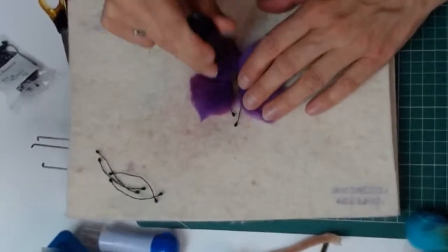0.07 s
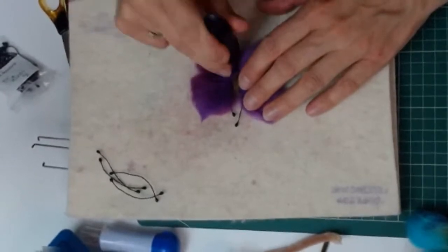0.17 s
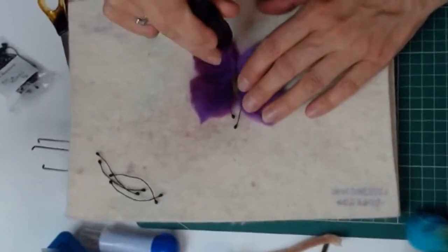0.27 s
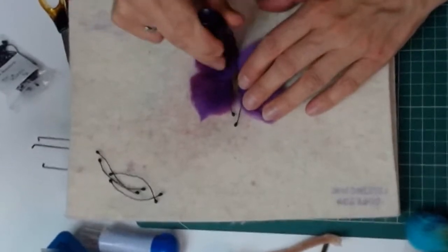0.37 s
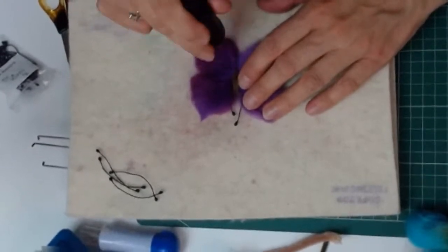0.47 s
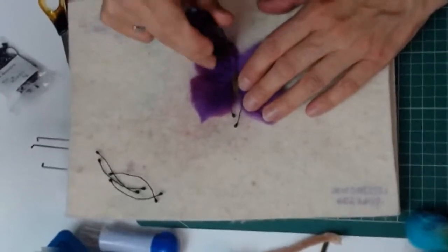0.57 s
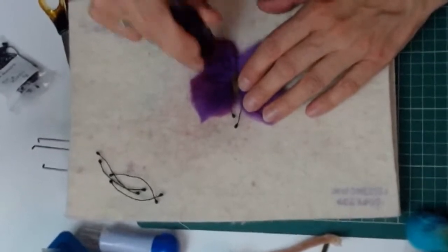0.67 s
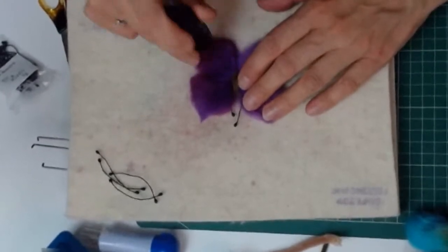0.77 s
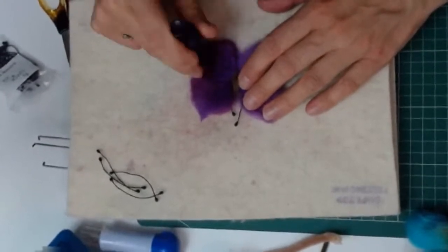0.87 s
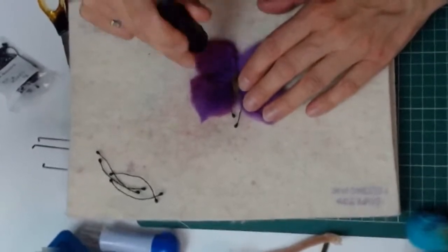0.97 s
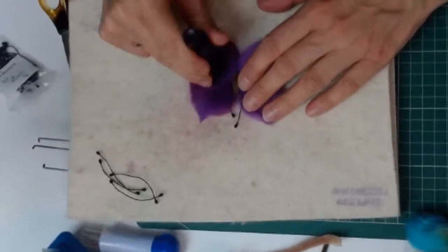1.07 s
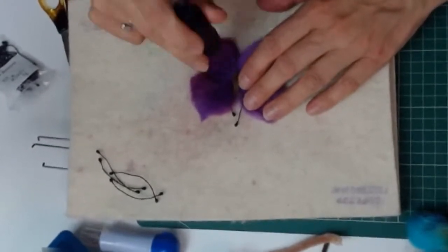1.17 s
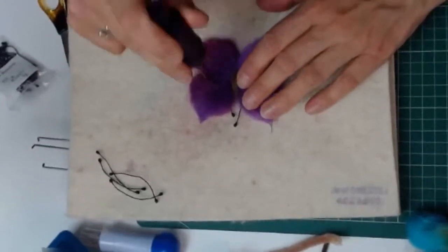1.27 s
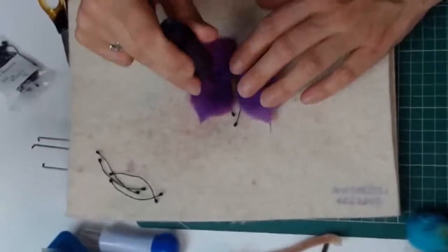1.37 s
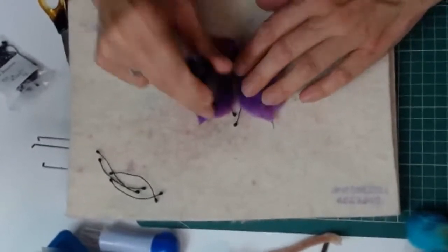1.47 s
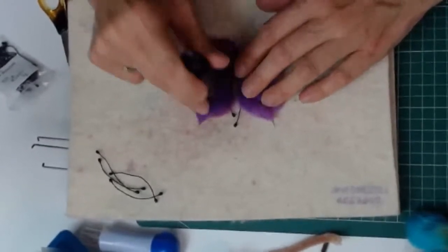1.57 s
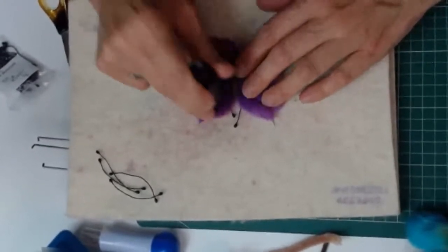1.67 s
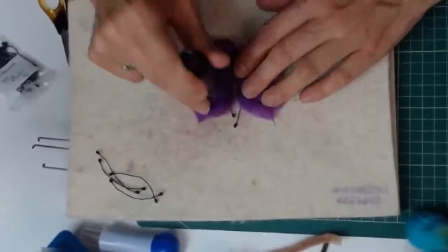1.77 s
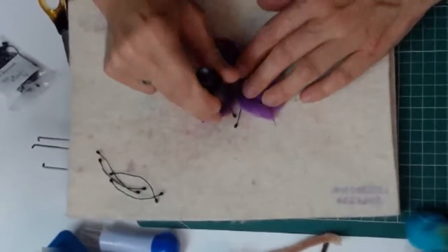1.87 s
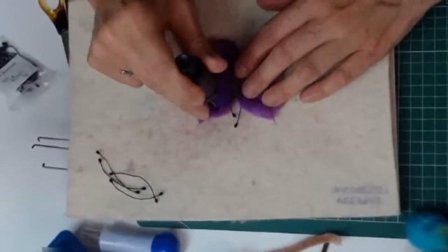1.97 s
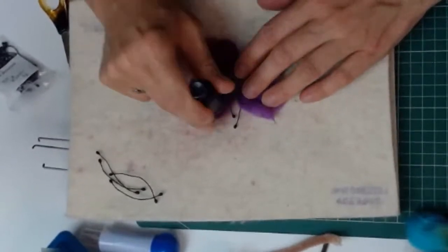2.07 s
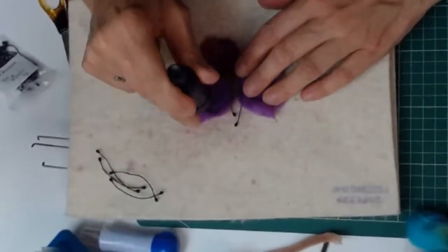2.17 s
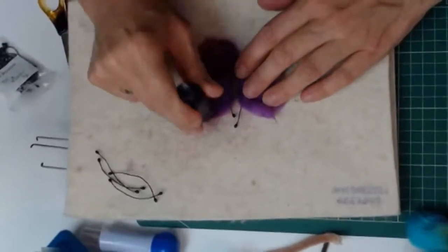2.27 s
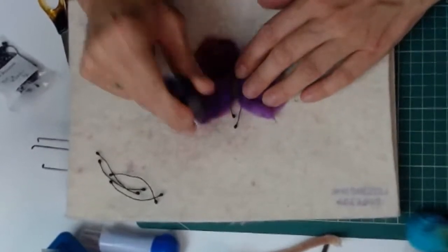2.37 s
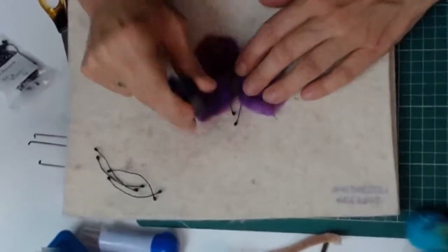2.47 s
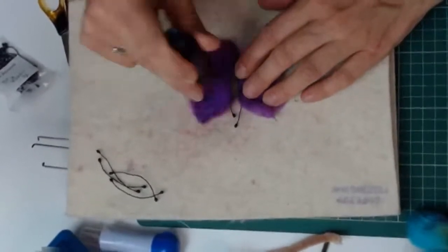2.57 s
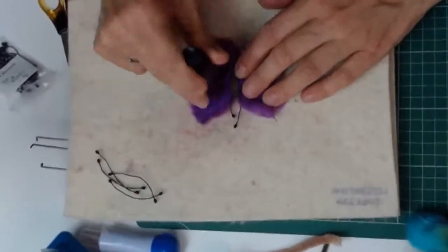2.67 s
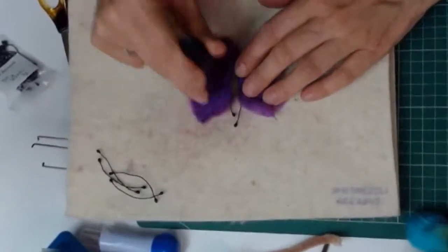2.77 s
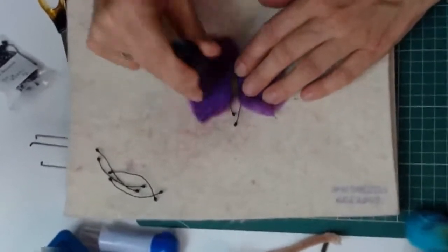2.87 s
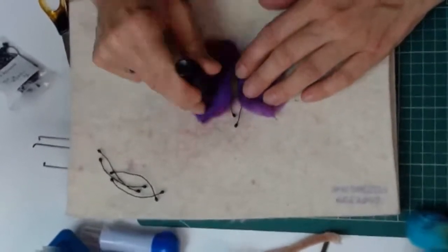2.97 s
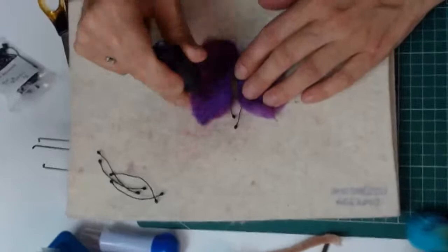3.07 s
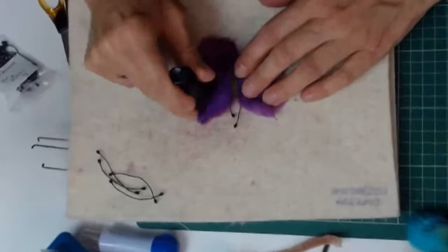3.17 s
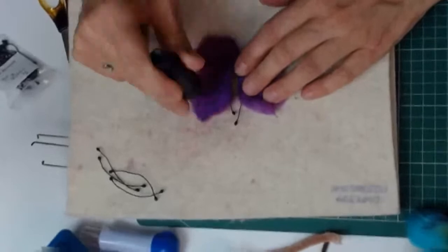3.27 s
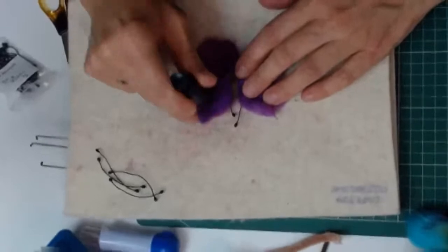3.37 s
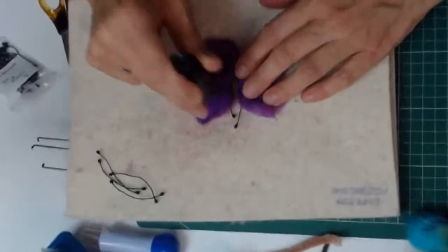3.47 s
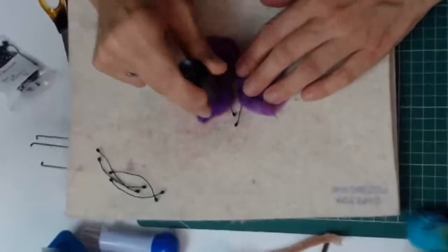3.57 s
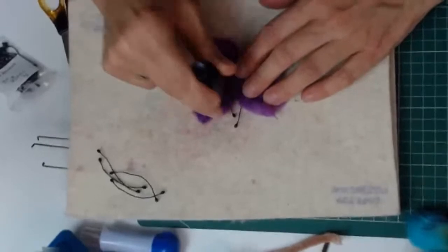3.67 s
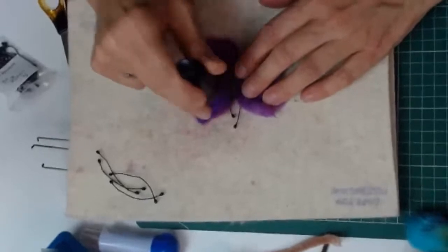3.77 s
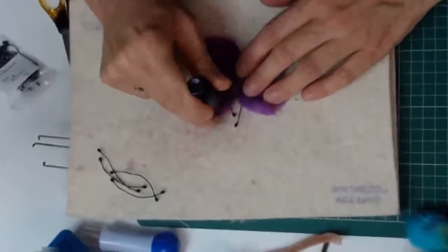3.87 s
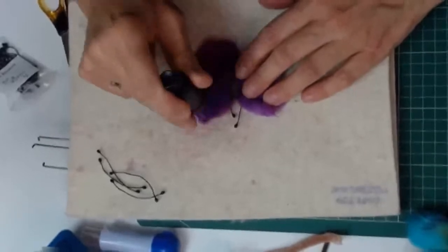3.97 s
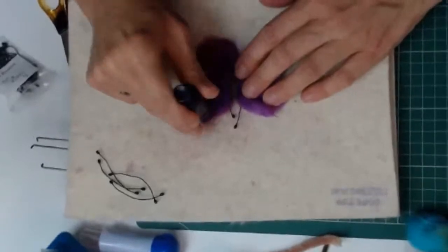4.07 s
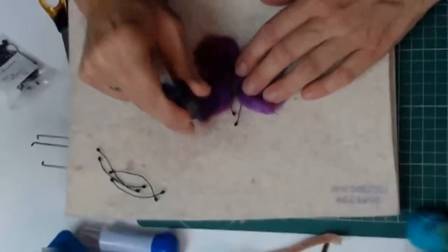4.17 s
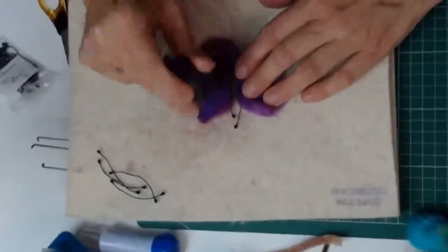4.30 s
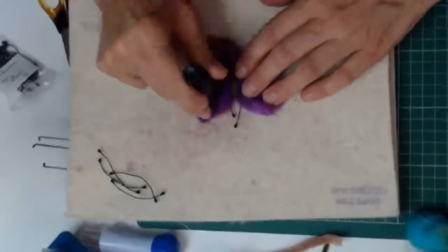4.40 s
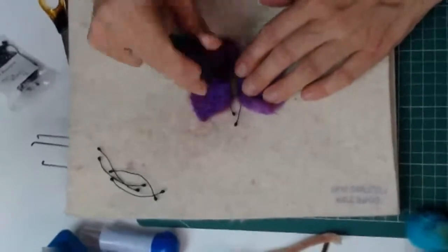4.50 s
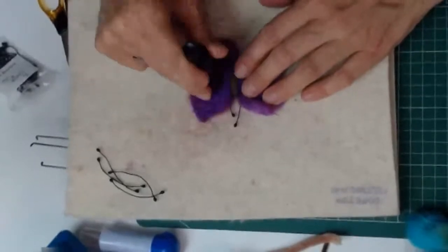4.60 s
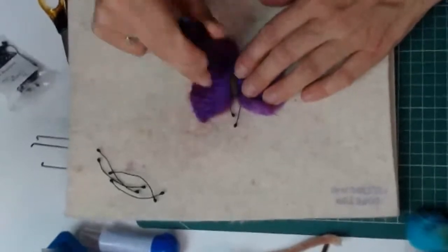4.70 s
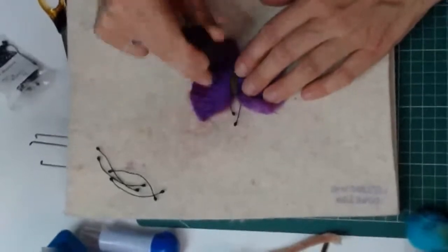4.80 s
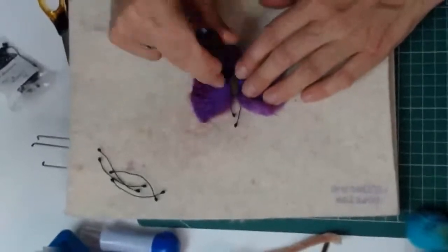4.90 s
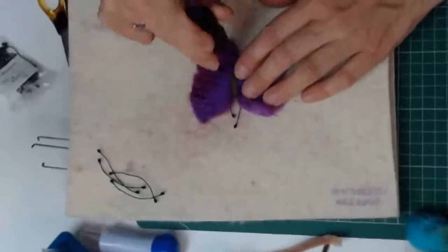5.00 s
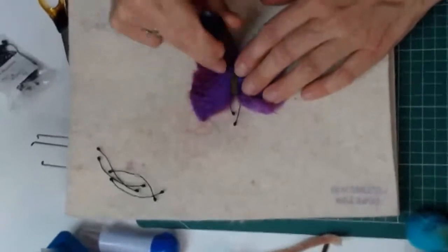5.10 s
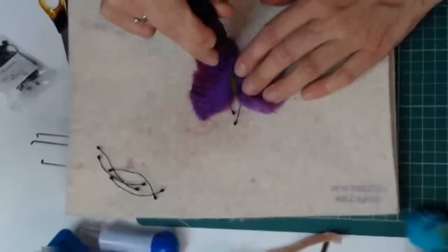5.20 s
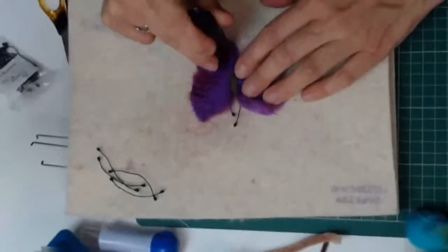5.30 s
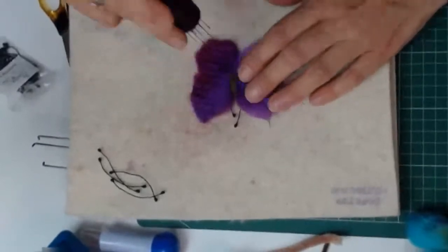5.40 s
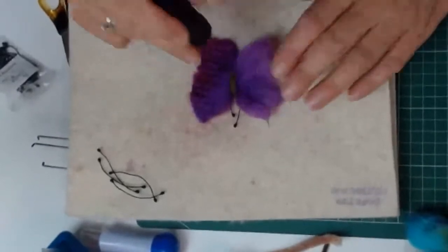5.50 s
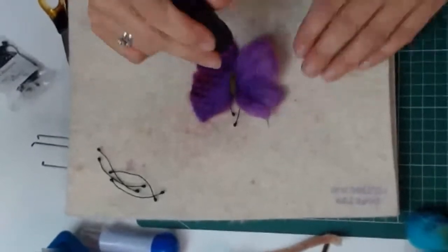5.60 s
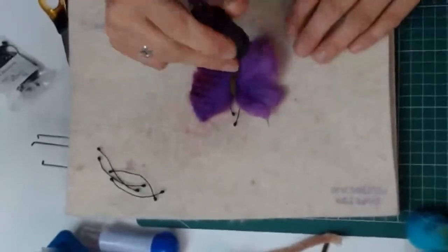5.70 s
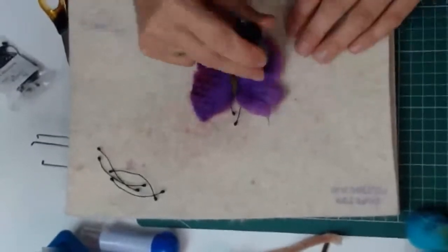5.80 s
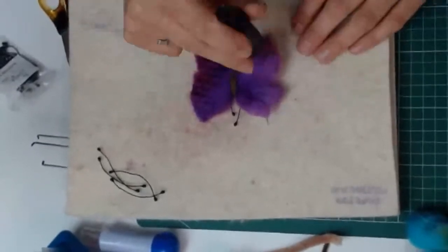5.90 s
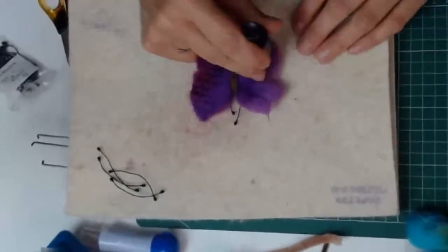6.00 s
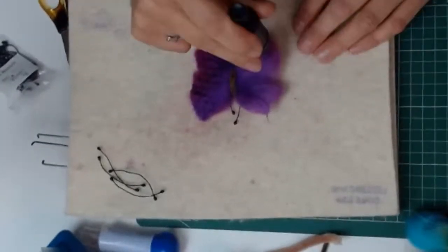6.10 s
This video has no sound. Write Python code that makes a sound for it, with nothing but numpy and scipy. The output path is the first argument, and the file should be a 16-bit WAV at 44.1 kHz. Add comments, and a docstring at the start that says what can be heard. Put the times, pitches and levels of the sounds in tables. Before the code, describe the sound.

Close, soft crunches and dull table thumps repeat about six times a second as felting needles poke wool in a quiet, humming room.

```python
"""Soft, crunchy stabs, about six a second: a needle felting tool pokes wool on a thick mat, close by.
Each stab tears through the fibres and thumps the table, which sways, knocks and rings.
Between stabs the needles tick and rustle as they pull out, and the felt creaks as it springs back.
Skin scuffs the mat now and then, and near the end a hand slides off it and fingers tap it.
Behind it all is the low hum of a quiet room with a faint, thin tone."""
import sys
import numpy as np
from scipy import signal
from scipy.fft import rfft, irfft, next_fast_len
from scipy.io import wavfile
from scipy.ndimage import uniform_filter1d

SR = 44100
rng = np.random.default_rng(int(sys.argv[2]) if len(sys.argv) > 2 else 0)


def wrap_up_sound(samples):
    """Save the sound to the file named by the first command line argument, as 16-bit audio."""
    columns = np.atleast_2d(samples).T
    # keep every value between -1 and 1, then stretch to whole-number steps
    tamed = np.clip(columns, -1, 1)
    steps = np.round(tamed * 32767).astype(np.int16)
    wavfile.write(sys.argv[1], SR, steps)


N = 271126
TIME_S = np.arange(N) / SR


def gain_of(db):
    """Turns decibels into a number to multiply a sound by."""
    return 10 ** (np.asarray(db) / 20)


def curve_at(points, hz):
    """Joins a table's points along a log frequency axis and reads the value at hz."""
    pitches, values = np.transpose(points)
    return np.interp(np.log(hz + 1), np.log(pitches + 1), values)


def evened(x):
    """Scales a sound to an average (rms) size of 1."""
    return x / np.sqrt(np.mean(x ** 2) + 1e-20)


def add(mix, start_s, sound):
    """Mixes a sound in at start_s."""
    part = mix[..., max(round(start_s * SR), 0):][..., :sound.shape[-1]]
    part += sound[..., :part.shape[-1]]


def split(x, hz):
    """The parts of a sound below and above hz."""
    low = signal.sosfiltfilt(signal.butter(2, hz, fs=SR, output="sos"), x)
    return low, x - low


def stroke(length_s, rise_s, tail_s):
    """The loudness of one rub: it swells, weakens while it lasts, then dies away."""
    t = np.arange(round((length_s + rise_s + 6 * tail_s) * SR)) / SR
    swell = np.clip(t / rise_s, 0, 1) ** 2
    return swell * np.exp(-t / 0.081 - np.maximum(t - rise_s - length_s, 0) / tail_s)


def ringing(notes):
    """A struck object's notes: sine waves that each fade by 60 dB in ring_s."""
    def note(pitch_hz, level_db, ring_s, signed_gain=1):
        t = np.arange(SR) / SR
        return signed_gain * gain_of(level_db - 60 * t / ring_s) * np.sin(2 * np.pi * pitch_hz * t)
    return sum(note(*row) for row in notes)


# How alike left and right are (1 = the same): pitch_hz, likeness
STEREO_LIKENESS = [(120, 0.74), (300, 0.94), (700, 0.95), (1600, 0.72), (2800, 0.83), (5500, 0.69),
                   (8000, 1)]

def grit(colour, grain_db, patchy_db, grain_s=0.001):
    """Stereo noise like snapping fibres: grain_db makes it rough, patchy_db makes its colour drift."""
    size = next_fast_len(N)
    hz = np.fft.rfftfreq(size, 1 / SR)
    grain = np.interp(np.arange(N), np.arange(N) * grain_s * SR, rng.standard_normal(N))
    shared, apart = rfft(gain_of(grain_db * grain) * rng.standard_normal((2, N)), size)
    likeness = np.clip(curve_at(STEREO_LIKENESS, hz), 0, 1)
    shared *= np.sqrt((1 + likeness) / 2)
    apart *= np.sqrt((1 - likeness) / 2)
    left_right = np.array([shared + apart, shared - apart])
    noise = irfft(gain_of(curve_at(colour, hz)) * left_right, size)[:, :N]
    slices = signal.stft(noise, nperseg=256)[2]
    patches = uniform_filter1d(rng.standard_normal(slices.shape[1:]), size=4, axis=0)  # blur in pitch
    patches = uniform_filter1d(patches, size=6, axis=1)  # blur in time
    slices *= gain_of(patchy_db * evened(patches))
    return evened(signal.istft(slices, nperseg=256)[1][:, :N])


# The colour of the room's noise: pitch_hz, level_db
ROOM_COLOUR = [(20, 4), (54, -0.5), (110, -11), (149, -3.5), (261, -16.5), (370, -18.5), (684, -22.5),
               (1030, -23), (1710, -30.5), (2500, -35.5), (7460, -45), (8690, -75.5)]

def room_tone():
    """A quiet room's low hum and air noise, plus a thin tone that fades near the end."""
    tone_db = np.interp(TIME_S, [5.1, 5.6], [-90, -101])
    tone = gain_of(tone_db) * np.sqrt(2) * np.sin(2 * np.pi * 8000 * TIME_S)
    return gain_of(-57) * grit(ROOM_COLOUR, grain_db=0, patchy_db=1) + tone


def wall_echo(sound, ring_s=0.22):
    """A short, blurred echo: long waves reach both sides alike, short ones differ."""
    t = np.arange(SR // 2) / SR
    low, high = split(rng.standard_normal((2, len(t))), hz=460)
    tail = (low[0] + high) * gain_of(-60 * t / ring_s) * (t > 0.004)
    return signal.fftconvolve(sound, tail / np.linalg.norm(tail[0]), axes=1)[:, :N]


# Skin rubbing the mat: start_s, level_db, length_s, pitch_hz
SKIN_SCUFFS = [(0.072, -68.5, 0.31, 1690), (2.5, -72.5, 0.16, 2100), (2.73, -70.5, 0.21, 1750),
               (3.585, -73.5, 0.22, 1760), (5.344, -64.5, 0.097, 1520), (5.46, -66.5, 0.073, 1200)]

def skin_scuffs():
    """Skin sticks and slips on the mat, making a narrow band of noise around one pitch."""
    out = np.zeros((2, N))
    noise = grit([(100, 0.026), (9000, 0.0062)], grain_db=0.8, patchy_db=0, grain_s=0.0019)
    for s, db, length_s, hz in SKIN_SCUFFS:
        shape = signal.windows.tukey(round((length_s + 0.024) * SR), 0.5)
        band = signal.butter(2, [hz * 0.866, hz * 1.08], "bandpass", fs=SR, output="sos")
        rub = signal.sosfilt(band, noise[:, round(s * SR):][:, :len(shape)])
        add(out, s, gain_of(db) * shape * evened(rub))
    return out


# How strongly the mat and table answer where the tool is; the last three are the table top's notes:
# time_s, knock_db, ring_db, creak_db, low_db, middle_db, high_db
TOOL_SPOTS = [(0.051, -2.5, 6, 2.5, -5.5, 2.5, -0.4), (0.501, -7, 7, 0.5, -2.5, 2.5, 0.55),
              (0.9, 2, 1, -4, -3.5, 2.5, 0.57), (1.501, -2, 2.5, -8, 0, 4, 1.5),
              (2.05, 6.5, 0, -5.5, 3.5, 4.5, 1.3), (2.5, 4, 5, 6, -1.5, -0.5, -2.3),
              (2.95, 2, 4.5, 1.5, 2, 6.5, -2.8), (3.401, 0.5, 3, 0, -1.5, -2, 0.76),
              (4.099, 0.5, 1, -4, 0.5, 1.5, 1.5), (4.7, -4, -2, -2.5, -2.5, -4.5, 0.68),
              (5.201, -2.5, 0, 5, -9.5, 7, 2), (6, -0.5, -1, -7, 0.5, 3, -0.83)]

def spot_gain(part, time_s):
    """The tool wanders over the mat, so it stirs each part more or less as time goes by."""
    times, *levels = np.transpose(TOOL_SPOTS)
    column = ["knock", "ring", "creak", "low", "middle", "high"].index(part)
    return gain_of(np.interp(time_s, times, levels[column]))


# The colour of creaking felt: pitch_hz, level_db
CREAK_COLOUR = [(250, 6), (400, 2), (1000, -0.5), (1900, -10.5), (2300, -32.5)]
SLIDE_START_S, SLIDE_LENGTH_S = 5.28, 0.41  # a hand slides off the mat

def felt_creak():
    """The felt creaks as it springs back after each stab and as the hand slides off."""
    loudness = np.zeros(N)
    for s, force_db, *_ in NEEDLE_STABS:
        add(loudness, s + 0.014, gain_of(force_db + 6) * spot_gain("creak", s) * stroke(0.034, 0.017, 0.11))
    add(loudness, SLIDE_START_S, gain_of(-0.5) * np.hanning(round(SLIDE_LENGTH_S * SR)))
    return gain_of(-63.5) * loudness * grit(CREAK_COLOUR, grain_db=3.5, patchy_db=3, grain_s=0.006)


# The colour of rustling wool: pitch_hz, level_db
WOOL_COLOUR = [(1000, -9), (2000, -9), (3200, -5), (5000, -6.5), (7000, -8.5), (7600, -15.5), (8600, -32)]

def wool_crackle():
    """Loose wool crackles when a stab or the sliding hand stirs it."""
    loudness = np.zeros(N)
    for s, *_ in NEEDLE_STABS:
        add(loudness, s + 0.014, np.hanning(round(0.2 * SR)))
    add(loudness, SLIDE_START_S, 0.47 * np.hanning(round(SLIDE_LENGTH_S * SR)))
    return gain_of(-69) * loudness * grit(WOOL_COLOUR, grain_db=4.5, patchy_db=4, grain_s=0.005)


# Needles snagging loose wool: start_s, level_db, length_s
STRAY_CATCHES = [(0.986, -57, 0.015), (1.179, -54.5, 0.0064), (1.269, -61.5, 0.059), (1.659, -66, 0.013),
                 (2.319, -62, 0.0029), (2.516, -61.5, 0.024), (2.58, -55.5, 0.016), (3.243, -70, .004),
                 (3.264, -57.5, 0.004), (3.438, -57, 0.0061), (3.813, -59, 0.0054), (3.987, -55.5, 0.0031),
                 (4.289, -58, .004), (4.307, -55, 0.016), (4.335, -53, 0.032), (4.492, -57, 0.02),
                 (4.845, -57, 0.0046), (5.014, -57.5, 0.0046), (5.236, -63, 0.0038), (5.36, -73, .003),
                 (5.384, -59, 0.019), (5.437, -60, 0.014), (5.5, -62, .005), (5.586, -67.5, .004),
                 (5.793, -60, 0.0052), (5.812, -57, 0.011), (6.072, -72, 0.0035), (6.126, -58, 0.004)]

def needle_rustles():
    """Steel drags on wool: short, bright ticks and rustles, each a little brighter or duller at random."""
    # each drag: start_s, level_db, length_s, tail_s, bright_db
    brushes = [(s - 0.057, db, 0.014, 0.011, 8) for s, *_, db, _, _ in NEEDLE_STABS]
    pulls = [(s + delay_s, db, 0.0059, 0.0029, 5.5) for s, *_, delay_s, db in NEEDLE_STABS]
    catches = [(*row, 0.0065, 6) for row in STRAY_CATCHES]
    dull, bright = np.zeros((2, N))
    for s, db, length_s, tail_s, bright_db in brushes + pulls + catches:
        tilt_db = bright_db - rng.standard_normal()
        shape = stroke(length_s, 0.0022, tail_s)
        add(dull, s, gain_of(db - tilt_db / 2) * shape)
        add(bright, s, gain_of(db + tilt_db / 2) * shape)
    low, high = split(grit(WOOL_COLOUR, grain_db=3, patchy_db=0.73), hz=5200)
    return low * dull + gain_of(-3.5) * high * bright


# The table's slow sway: pitch_hz, level_db, ring_s, signed_gain (minus flips the wave)
SWAY_NOTES = [(17.33, -32, 0.52, -0.8), (36.36, -28.5, 0.3, -1.3), (42.5, -22.5, 0.088, 1)]
# Its low knock, a single note: same columns
KNOCK_NOTE = (68.5, -40, 0.5, 2.5)
# Two close notes that beat, so the table's ring swells late: same columns
RING_NOTES = [(140.95, -34, 0.46, 1.725), (157.4, -41, 0.21, -2.1)]

def table_thumps():
    """The hand lands sharply and lets go more slowly, so the table sways, knocks and rings."""
    def push(peak_s, width_s):
        t = np.arange(3000) / SR
        return np.exp(-((t - peak_s) / width_s) ** 2 / 2) / (width_s * SR * np.sqrt(2 * np.pi))
    out = np.zeros(N)
    sway, knock, ring = ringing(SWAY_NOTES), ringing([KNOCK_NOTE]), ringing(RING_NOTES)
    for s, force_db, *_ in NEEDLE_STABS:
        late, firm = rng.standard_normal(2)
        landing = push(0.01335, 0.0017)
        letting_go = (1.88 + 0.037 * firm) * push(0.0397 + 0.0012 * late, 0.0048)
        table = sway + spot_gain("knock", s) * knock + spot_gain("ring", s) * ring
        blow_db = -3 + 0.35 * force_db  # grows more slowly than the force at the tips
        add(out, s - 0.02, gain_of(blow_db) * signal.fftconvolve(landing - letting_go, table))
    return out


# The table top's own notes, low to high: pitch_hz, level_db, ring_s
TOP_NOTES = [(101, -3.5, 0.15), (207.9, -2.5, 0.24), (262.6, -6, 0.19), (373.6, -9.5, 0.23),
             (402.2, -4, 0.087), (455, -5.5, 0.11), (502, -1.5, 0.065), (556, -4.5, 0.039),
             (900, -13.5, 0.11), (1126, -11, 0.065)]
# Fingers touching the mat: start_s, force_db
FINGER_TAPS = [(5.409, -17), (5.514, -11.5), (5.914, -7.5)]

def table_top_thuds():
    """Needles grind in and hit bottom with a jolt, shaking the table top; finger taps shake it too."""
    pressure, jolts = np.zeros((2, N))
    jolt = signal.windows.hann(round(0.00072 * SR) + 3)
    for s, force_db, _, length_s, *_ in NEEDLE_STABS:
        add(jolts, s - 0.0015, gain_of(29.5 + force_db) * jolt / jolt.sum())
        add(pressure, s - 0.008, gain_of(force_db - 1.5) * stroke(length_s - 0.006, 0.012, 0.028))
    for s, force_db in FINGER_TAPS:
        add(pressure, s, gain_of(force_db) * stroke(0.0023, 0.00093, 0.0044))
    grind_colour = [(80, 4.5), (2000, -6.5), (3000, -18.5)]  # pitch_hz, level_db
    grind = pressure * grit(grind_colour, grain_db=3.5, patchy_db=4.8, grain_s=0.0044)
    centred = 0.34 * (grind + grind[::-1])  # the same left and right
    groups = [("low", centred, TOP_NOTES[:3]), ("middle", grind, TOP_NOTES[3:5]),
              ("high", grind, TOP_NOTES[5:])]
    out = np.zeros((2, N))
    for part, rub, notes in groups:
        shake = (rub + jolts) * spot_gain(part, TIME_S)
        out += signal.fftconvolve(shake, ringing(notes)[None], axes=1)[:, :N]
    return gain_of(-77) * out


# The colour of tearing fibres: pitch_hz, level_db
CRUNCH_COLOUR = [(280, -7.5), (420, -4), (700, -7.5), (1200, -8.5), (1960, -14.5), (2840, -11), (3840, -19),
                 (7270, -23), (8690, -48)]
# Each stab brushes the fluff on the way down, crunches in, and ticks as it pulls out:
# start_s, force_db, crunch_db, crunch_length_s, brush_db, pull_delay_s, pull_db
NEEDLE_STABS = [(0.045, 2, -43, 0.018, -63.5, 0.049, -57), (0.22, 0, -46, 0.018, -62.5, .05, -61),
                (0.385, -3, -47, 0.022, -64, 0.056, -74), (0.554, -0.5, -43, 0.024, -63.5, 0.056, -76),
                (0.738, -0.5, -39.5, 0.0057, -60.5, 0.075, -64), (0.906, 1.5, -44, 0.02, -60.5, 0.042, -71),
                (1.102, 1, -44, 0.019, -57.5, 0.038, -53.5), (1.534, 0.8, -44.5, 0.015, -64, 0.051, -56),
                (1.731, 2, -39, 0.0067, -82, 0.043, -54), (1.916, -2.5, -48, 0.018, -85, 0.04, -53),
                (2.088, -0.5, -44.5, 0.021, -82, 0.054, -59), (2.26, 2, -42.5, 0.02, -64, 0.058, -63),
                (2.442, 3, -40.5, 0.017, -61, 0.055, -60), (2.661, 0.3, -43, 0.014, -76, 0.042, -50),
                (2.832, -0.5, -43.5, 0.027, -57, 0.05, -54.5), (3.001, 4, -42, 0.019, -59.5, 0.071, -60.5),
                (3.176, 3.5, -43, 0.019, -59, 0.047, -54.5), (3.36, 4.5, -42, 0.014, -59, 0.047, -52.5),
                (3.543, 0.5, -45.5, 0.023, -57.5, 0.043, -51.5), (3.72, 0.5, -45, 0.023, -62, 0.05, -50),
                (3.896, 3, -43, 0.019, -57.5, 0.049, -52.5), (4.069, 1, -41.5, 0.01, -58, 0.048, -49),
                (4.231, 1, -44.5, 0.017, -62, 0.05, -59), (4.419, 5, -40.5, 0.014, -78, 0.032, -57),
                (4.591, -1.5, -44, 0.028, -60.5, 0.058, -58.5),
                (4.766, 0.5, -44.5, 0.027, -58.5, 0.059, -56.5), (4.933, 3.5, -41, 0.02, -58, 0.052, -57),
                (5.1, -2, -44, 0.026, -56, 0.066, -60.5), (5.259, -4.5, -44.5, 0.028, -78, .077, -75),
                (5.838, -11, -54, 0.022, -79, 0.048, -54), (6.001, 0.3, -43.5, 0.019, -58, 0.058, -54)]

def needle_crunch():
    """Barbs on the needles tear through the fibres; a harder stab crunches deeper."""
    dull, bright = np.zeros((2, N))
    for s, force_db, crunch_db, length_s, *_ in NEEDLE_STABS:
        dull_db = crunch_db + 0.08 * force_db
        add(dull, s - 0.011, gain_of(dull_db) * stroke(length_s - 0.006, 0.0087, 0.021))
        add(bright, s - 0.009, gain_of(crunch_db) * stroke(length_s - 0.005, 0.0097, 0.0088))
        add(bright, s - 0.015, gain_of(crunch_db - 6) * stroke(0.0028, 0.0065, 0.00081))  # tips touch
    low, high = split(grit(CRUNCH_COLOUR, grain_db=4, patchy_db=2), hz=2200)
    return low * dull + high * bright


def scene():
    """Wool, mat and table sound together in the room, whose walls add a short echo."""
    crunch, thuds = needle_crunch(), table_top_thuds()
    wool = crunch + needle_rustles() + wool_crackle() + felt_creak() + skin_scuffs()
    echo = wall_echo(gain_of(-8.5) * wool + gain_of(-14.5) * thuds)
    return wool + thuds + echo + table_thumps() + room_tone()


def record(dry):
    """The microphone hears the treble a little louder on the right and cuts off the highest sounds."""
    low, high = split(dry, hz=2500)
    stereo = low + high * gain_of([[-0.7], [0.7]])
    treble_cut = signal.firwin(1023, cutoff=8800, window=("kaiser", 10), fs=SR)
    return signal.oaconvolve(stereo, treble_cut[None], "same")


dry = scene()
out = record(dry)
wrap_up_sound(out)
```